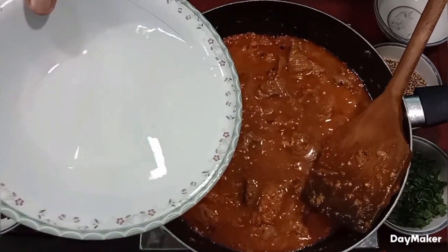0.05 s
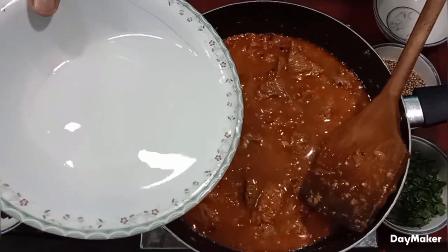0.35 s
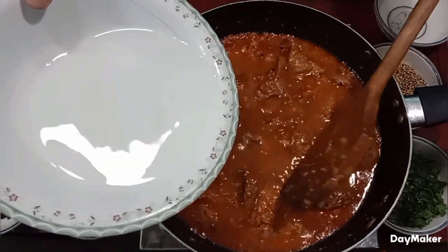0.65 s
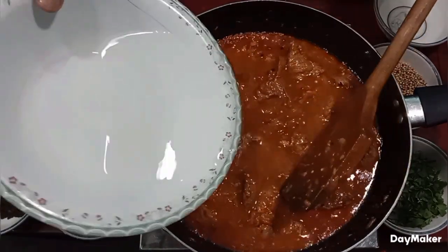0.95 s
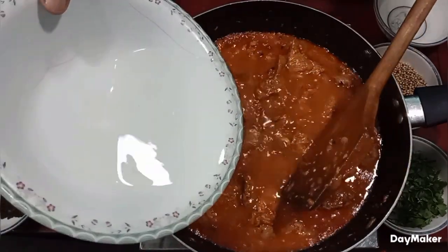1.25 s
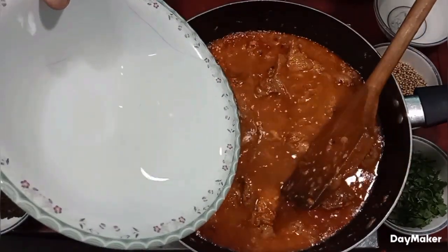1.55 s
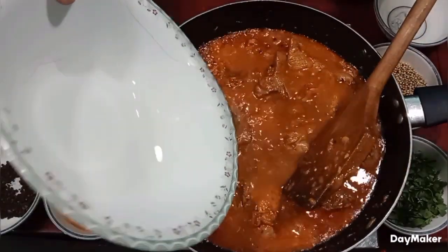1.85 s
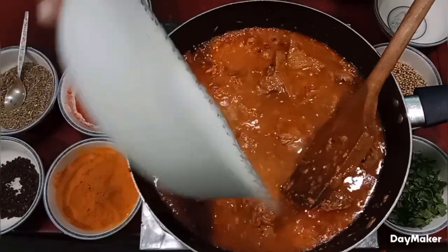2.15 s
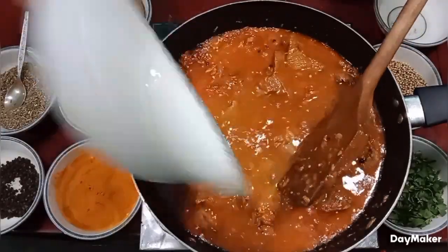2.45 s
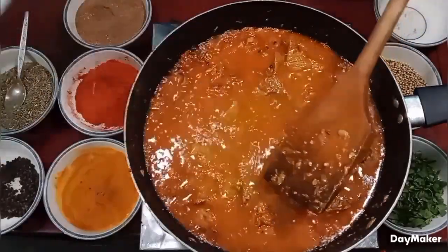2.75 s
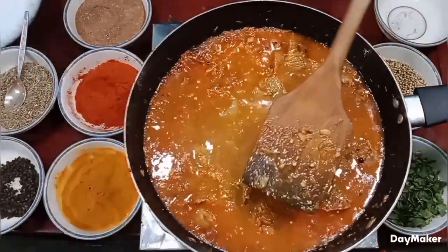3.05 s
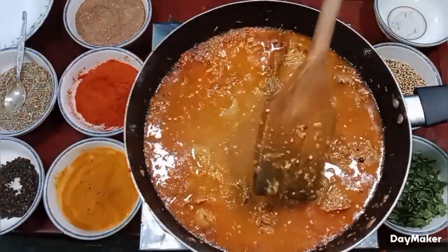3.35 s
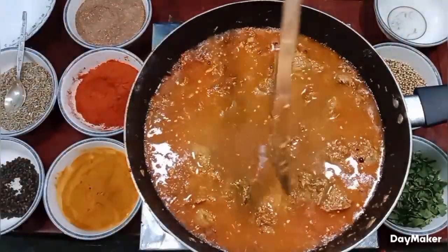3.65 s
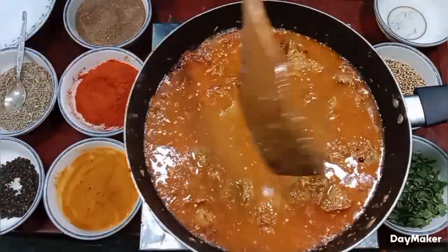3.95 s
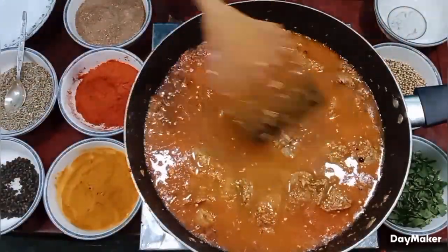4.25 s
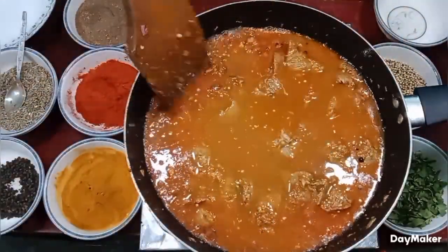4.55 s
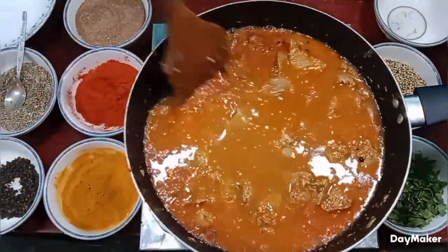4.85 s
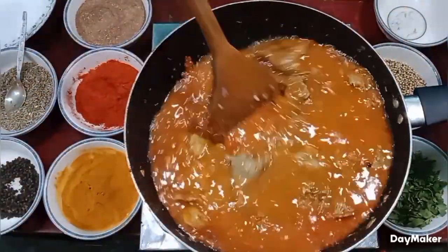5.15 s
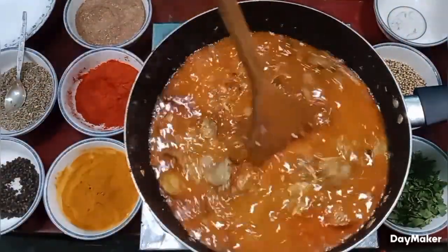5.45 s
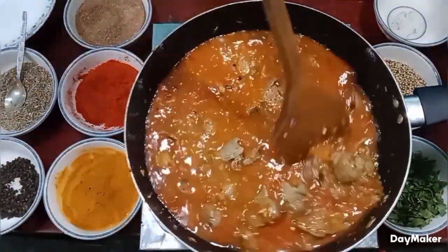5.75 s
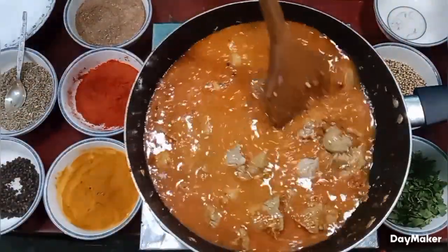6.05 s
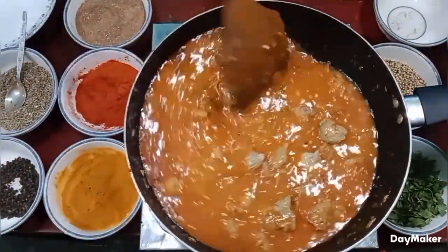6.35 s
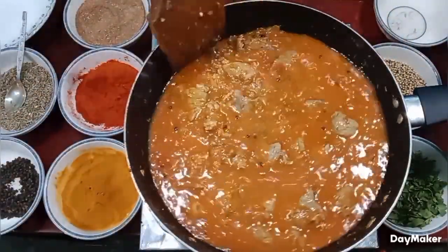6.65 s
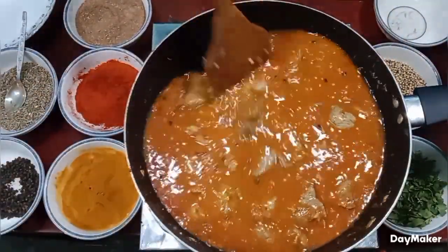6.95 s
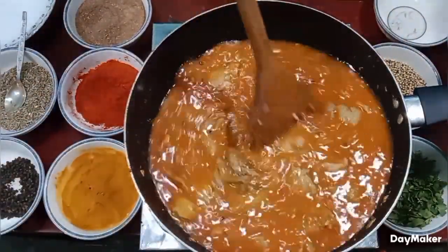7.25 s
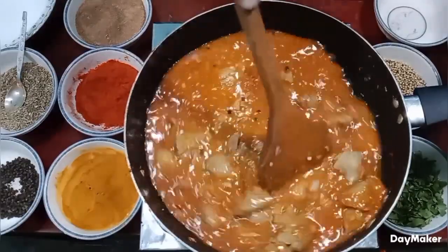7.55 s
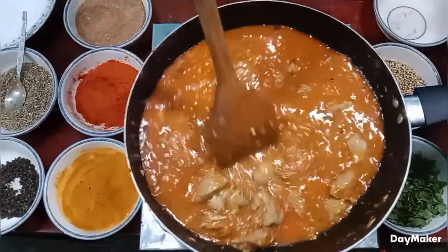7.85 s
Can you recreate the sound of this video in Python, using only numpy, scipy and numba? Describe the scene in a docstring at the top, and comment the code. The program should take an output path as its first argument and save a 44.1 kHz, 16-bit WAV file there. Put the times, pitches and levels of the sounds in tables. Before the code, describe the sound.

Meat and sauce sizzle and spit in a hot pan, then a wooden spatula knocks and stirs as the frying dies down.

```python
"""A small, hard kitchen, heard close to a hot frying pan of meat and sauce as water slips in from a bowl.
Tiny steam bubbles burst in a dense sizzle, larger ones sound a hollow note, and fat spits.
A wooden spatula knocks and judders on the pan, exciting its modes, then stirs. Sauce pushed up the
hot wall flares into a hiss, which dies down again as the cool water mixes in."""
import sys
import numpy as np
from scipy import signal
from scipy.fft import rfft, irfft
from scipy.io import wavfile
from scipy.ndimage import uniform_filter1d
from numba import njit

SR = 44100
rng = np.random.default_rng(int(sys.argv[2]) if len(sys.argv) > 2 else 0)


def master(y):
    """Save y as 16-bit WAV."""
    cut = np.clip(np.atleast_2d(y).T, -1, 1)
    pcm = np.round(cut * 32767)  # scale
    wavfile.write(sys.argv[1], SR, pcm.astype(np.int16))


N = 348390
T = np.arange(N) / SR

# The sizzle of the whole pan. Each row: time in seconds, heat (the level of the fine fizz) in dB,
# coarse bubbles relative to the fizz in dB.
PAN_SIZZLE = [(0.0, -48.5, 0), (0.22, -53.5, -2.5), (0.55, -55, -6.5), (1.38, -57.5, -4.5),
              (1.8, -55.5, -2), (2.1, -49.5, -3.5), (2.22, -48, -4.5), (3.05, -47, -4.5), (3.32, -44, 0),
              (3.66, -49, -8), (4.0, -49.5, -3.5), (4.55, -57.5, -2.5), (5.22, -64.5, -13), (5.6, -68, -14),
              (5.77, -74, -18), (6.2, -71, -12.5), (7.3, -71.5, -15), (7.9, -74.5, -11.5)]
# Sauce pushed up the hot wall. Each row: hottest moment, rise time, time at full level before and after
# that moment, and moment covered again, all in seconds; hiss, afterglow and boil in dB; top pitch in Hz.
WALL_FLARES = [(4.68, 0.096, 0.043, 0.13, 5.06, -45, -47.5, -49.5, 2340),
               (6.65, 0.18, 0.18, 0.068, 7.25, -45, -53, -48, 2860)]
FLARE_RISE_DB, FLARE_FALL_DB_PER_S = 24.5, 125  # the climb during the rise time; the fall afterwards


def undb(db):
    """Decibels to amplitude gain."""
    return 10 ** (np.asarray(db) / 20)


def unit(x):
    """Normalise to rms 1."""
    return x / (np.std(x) + 1e-12)


def curves(rows):
    """Linear interpolation in time of each column after the first."""
    times, *columns = np.transpose(rows)
    return [np.interp(T, times, column) for column in columns]


def decay(t, t60):
    """Exponential damping: 60 dB down after t60 seconds."""
    return np.exp(-np.log(1000) * t / t60)


def plateau(start_s, end_s, rise_db_per_s, fall_db_per_s):
    """Attack, hold and release in dB, 0 at the top."""
    return -rise_db_per_s * np.maximum(start_s - T, 0) - fall_db_per_s * np.maximum(T - end_s, 0)


def swell(middle_s, length_s):
    """A Gaussian envelope: a smooth rise and fade."""
    return np.exp(-2 * ((T - middle_s) / length_s) ** 2)


def wander(moves_per_s):
    """Smooth random modulation with a spread of 1."""
    hold = max(int(SR / moves_per_s), 1)
    steps = np.repeat(rng.standard_normal(N // hold + 1), hold)
    return unit(uniform_filter1d(uniform_filter1d(steps, hold), hold)[:N])


def colour(x, points):
    """Minimum-phase filter through (Hz, dB) points, made by folding the cepstrum."""
    hz, db = np.transpose(points)
    size = 4096
    gain = undb(np.interp(np.log(np.fft.rfftfreq(size, 1 / SR) + 1), np.log(hz), db))
    cepstrum = irfft(np.log(gain))
    cepstrum[1:size // 2] *= 2
    cepstrum[size // 2 + 1:] = 0
    return signal.fftconvolve(x, irfft(np.exp(rfft(cepstrum))))[:len(x)]


def cut(x, hz, kind, order, zero_phase=False):
    """Low-pass or high-pass; for zero phase it runs forwards and backwards."""
    run = signal.sosfiltfilt if zero_phase else signal.sosfilt
    return run(signal.butter(order, hz, kind, fs=SR, output="sos"), x)


@njit
def bandpass(x, hz, width_hz):
    """A state-variable resonator whose centre and bandwidth may move."""
    out, band_state, low_state = np.empty(len(x)), 0., 0.
    for i in range(len(x)):
        tuning, damping = np.tan(np.pi * hz[i] / SR), width_hz[i] / hz[i]
        band = (band_state + tuning * (x[i] - low_state)) / (1 + tuning * (tuning + damping))
        band_state = 2 * band - band_state
        low_state += 2 * tuning * band
        out[i] = damping * band
    return out


def resonate(x, hz, width_hz):
    """Two resonators in cascade give a peak with steep skirts."""
    hz, width_hz = hz + np.zeros(N), width_hz + np.zeros(N)
    return bandpass(bandpass(x, hz, width_hz), hz, width_hz)


def narrow_noise(hz, half_width_hz):
    """Quadrature modulation centres a narrow band of noise on a pitch that may move."""
    in_phase, quadrature = cut(rng.standard_normal((2, N)), half_width_hz, "low", order=3)
    phase = 2 * np.pi * np.cumsum(hz + np.zeros(N)) / SR
    return unit(in_phase * np.cos(phase) + quadrature * np.sin(phase))


@njit
def bursts(start_s, hz, cycles, peak):
    """Each bubble is a damped oscillator: a quick swell, then a decay with a time constant in cycles."""
    out = np.zeros(N)
    for k in range(len(start_s)):
        life = cycles[k] * SR / hz[k]
        turn, fade = np.exp(2j * np.pi * hz[k] / SR), np.exp(-1 / life)
        phasor, envelope = 1 + 0j, 1.
        for i in range(int(start_s[k] * SR), min(N, int(start_s[k] * SR + 6 * life))):
            phasor, envelope = phasor * turn, envelope * fade
            out[i] += 4 * peak[k] * envelope * (1 - envelope) * phasor.imag
    return out


def crackle(per_s, spread_db, cycles):
    """Shot noise of steam bubbles of all pitches bursting at random: many faint, a few strong."""
    when, pitch, length, strength = rng.random((int(per_s * N / SR), 4)).T
    hz = 1000 + 15000 * pitch
    ring_cycles = cycles * (.5 + length) * np.sqrt(hz / 7000)
    peak = undb(spread_db * np.minimum(-np.log(1 - strength), 5.2)) * np.sqrt(hz / ring_cycles)
    return unit(bursts(when * N / SR, hz, ring_cycles, peak))


def settling():
    """A crossfade: 0 before the first stir mixes the water in, 1 after it."""
    return np.interp(T, [4.95, 5.3], [0, 1])


def heat():
    """Fizz level in dB: the pan, its spurts and its flares are incoherent, so their powers add."""
    # Water reaches hot fat in spurts of steam. Each row: middle and length in seconds, level in dB.
    spurts = [(0.44, 0.065, -55), (0.818, 0.064, -51.5), (1.175, 0.094, -58.5), (2.23, 0.047, -48),
              (2.403, 0.074, -45.5), (2.884, 0.078, -45.5)]
    power = undb(curves(PAN_SIZZLE)[0]) ** 2
    power += sum((undb(db) * swell(s, length_s)) ** 2 for s, length_s, db in spurts)
    for s, rise_s, before_s, after_s, covered_s, hiss_db, afterglow_db, _, _ in WALL_FLARES:
        end_s, rise_db_per_s = s + after_s, FLARE_RISE_DB / rise_s
        flare = plateau(s - before_s, end_s, rise_db_per_s, FLARE_FALL_DB_PER_S)
        # Afterglow: the bare wall fries on, slowly fading, until sauce covers and quenches it.
        afterglow = plateau(end_s, covered_s, rise_db_per_s, fall_db_per_s=190)
        afterglow -= 18.5 * np.maximum(T - end_s, 0)
        power += undb(hiss_db + flare) ** 2 + undb(afterglow_db + afterglow) ** 2
    return 10 * np.log10(power)


def kitchen(x, wet_db):
    """Reverberation: hard walls close by return a short, dense tail."""
    t = np.arange(int(.7 * SR)) / SR
    tail = cut(rng.standard_normal(len(t)), 7000, "low", order=1) * decay(t, t60=0.25) * (t > .005)
    return x + undb(wet_db) * signal.fftconvolve(x, tail / np.linalg.norm(tail))[:N]


def murmur(heat_db):
    """Saturation: the faint, low noise of simmering sauce grows with the heat only up to a ceiling."""
    # The spectrum of the simmer. Each row: frequency in Hz, gain in dB.
    simmer_spectrum = [(30, -17), (90, -6.5), (170, -2), (260, -3), (350, 1), (450, -4), (900, -0.5),
                       (1400, 3.5), (2500, -28.5)]
    simmer = unit(colour(rng.standard_normal(N), simmer_spectrum)) * undb(0.46 * wander(38))
    return simmer * undb(np.minimum(1.29 * (heat_db + 55.5) - 75.0, -74.5))


def hollow_note(heat_db):
    """Bubble resonance: larger bubbles sound one note, whose band narrows as the sauce settles."""
    # The strength of the note. Each row: time in seconds, level relative to the heat in dB.
    strength = [(0.0, -10.5), (0.42, -6.5), (0.56, -16.5), (1.7, -12), (2.9, -11.5), (3.7, -13.5),
                (4.45, -6.5), (5.04, -10), (5.2, -18), (5.85, -6), (6.15, -14.5), (6.5, -9), (6.95, -15),
                (7.5, -6), (7.9, -8)]
    settled = settling()
    surge = np.clip(wander(12), -2, 1.4)  # a surge of larger bubbles is lower and louder
    boiling = narrow_noise(1250 - 30 * surge, half_width_hz=87)
    calm = narrow_noise(1283 * (1 + .015 * wander(14)), half_width_hz=50)
    note = np.sqrt(1 - settled) * boiling + np.sqrt(settled) * calm
    return note * undb(heat_db + curves(strength)[0] + 1.45 * surge + 1.6 * wander(45))


def gulps():
    """Large bubbles well up in separate gurgles, their resonance sagging in pitch at the fullest."""
    # The gurgles. Each row: middle and length in seconds, level in dB.
    gurgles = [(0.141, 0.07, -62), (0.73, 0.08, -63.5), (1.124, 0.1, -62), (1.57, 0.07, -64),
               (1.921, 0.089, -62.5), (2.451, 0.035, -59), (3.633, 0.05, -55.5), (3.95, 0.06, -54.5),
               (4.99, 0.12, -57.5)]
    rest_hz, dip_hz = 1292, 125
    swells = [swell(s, length_s) for s, length_s, _ in gurgles]
    level = sum(undb(db) * shape for (_, _, db), shape in zip(gurgles, swells))
    return narrow_noise(rest_hz - dip_hz * sum(swells), half_width_hz=95) * level * undb(0.77 * wander(45))


def squelches():
    """Cavity resonance: small bubbles crackle between blade and meat, and the gap rings at two pitches."""
    # Sauce squeezed in the gap. Each row: middle and length in seconds, level in dB, lower pitch in Hz.
    squeezes = [(4.65, 0.038, -49, 2080), (5.02, 0.079, -57.5, 3600), (5.26, 0.089, -72.5, 3500),
                (5.451, 0.11, -71.5, 2950), (5.656, 0.03, -62.5, 3040), (5.948, 0.05, -85, 3800),
                (6.17, 0.11, -80.5, 4260), (6.67, 0.04, -46, 2500), (6.9, 0.1, -68.5, 2800),
                (7.52, 0.07, -78, 2800), (7.89, 0.026, -77.5, 2650)]
    out, froth = np.zeros(N), crackle(per_s=3300, spread_db=3.5, cycles=1.1)
    for s, length_s, db, hz in squeezes:
        gap = resonate(froth, hz, width_hz=420) + resonate(froth, hz * 1.26, width_hz=420)
        out += unit(gap) * undb(db) * swell(s, length_s)
    return out


def stirring():
    """Friction of the blade on the bottom makes the pan drone; each stroke churns the sauce in a swish."""
    # Drags. Each row: start and length in seconds, level in dB, fading in dB per second, pitch in Hz.
    drags = [(3.57, 0.18, -62.5, 3, 297), (4.649, 0.2, -44.5, 97, 318), (6.824, 0.14, -59, 60.5, 351),
             (7.2, 0.086, -70, 50.5, 332), (7.349, 0.076, -68.5, 88, 352), (7.58, 0.24, -75.5, 3, 347),
             (7.86, 0.045, -66, 60, 342)]
    # Wet strokes. Each row: middle and length in seconds, level in dB, pitch in Hz.
    strokes = [(4.672, 0.045, -52, 145), (6.526, 0.084, -73.5, 146.6), (6.545, 0.054, -67, 710),
               (6.597, 0.088, -64, 928), (6.704, 0.04, -40.5, 493), (6.806, 0.12, -58, 560),
               (6.946, 0.077, -69.5, 527), (7.199, 0.1, -70, 525), (7.227, 0.053, -65, 1287),
               (6.52, 0.13, -55, 1520), (7.417, 0.049, -78.5, 585), (7.431, 0.056, -78.5, 903),
               (7.501, 0.067, -82, 540), (7.839, 0.1, -76.5, 926), (7.869, 0.087, -66, 578)]
    out = np.zeros(N)
    for s, length_s, db, fade_db_per_s, hz in drags:
        pressure_db = plateau(s, s + length_s, rise_db_per_s=600, fall_db_per_s=350)
        pressure_db -= fade_db_per_s * np.maximum(T - s, 0)
        out += narrow_noise(hz, half_width_hz=21) * undb(db + pressure_db)
    for s, length_s, db, hz in strokes:
        out += narrow_noise(hz, half_width_hz=min(65, 0.25 * hz)) * undb(db) * swell(s, length_s)
    return out


def knocks():
    """Impact and stick-slip judder of wood excite the pan's modes; a softer contact leaves the low ones."""
    # Spatula blows. Each row: start in seconds, level in dB, treble cutoff in Hz,
    # judder relative to the blow in dB, judder time constant in seconds.
    blows = [(3.112, -17, 3002, -10, 0.015), (3.137, -28, 2600, 5, 0.019), (3.1682, -22, 1700, -1.5, 0.02),
             (3.278, -30.5, 4500, 0, 0.037), (3.322, -31.5, 4000, 3, 0.03),
             (3.4192, -27.5, 2090, -7.5, 0.013), (3.434, -32.5, 1530, -6, 0.011),
             (3.451, -34, 330, -8, 0.011), (3.483, -36.5, 346, 6, 0.013), (3.54, -47.5, 386, 4, 0.036),
             (4.621, -40.5, 1200, -2.5, 0.019), (4.661, -44.5, 420, -8, 0.014), (4.691, -46, 330, 3, 0.016),
             (4.745, -55, 300.7, -8, 0.02), (6.67, -36, 1250, 4, 0.021), (6.692, -39, 696, -12, 0.01),
             (6.719, -38.5, 600, -7, 0.0054), (6.786, -48.5, 280, -12, 0.0087)]
    # The modes of the pan. Each row: frequency in Hz, level in dB, time to fall 60 dB in seconds.
    pan_modes = [(110.4, -12, 0.24), (161.5, -18, 0.23), (257, -8.5, 0.22), (297, 0, .4), (339, -5.5, .4),
                 (374, 0, 0.27), (458, -8, 0.27), (488, -1, 0.13), (597, -7.5, 0.6), (649, -4.5, 0.46),
                 (706, 1, 0.22), (815, -11.5, 0.348), (838, -6.5, 0.19), (927.5, -9, 0.46),
                 (950, -10.5, 0.23), (1110, -10.5, .35), (1210, -9.5, .33), (1264, -9.5, 0.31),
                 (1383, -4.5, .35), (1420, -7, 0.29), (1647, -17, .5), (1790, -10.5, 0.2),
                 (2280, -12.5, .3), (2220, -2.5, .3), (2385, -9.5, 0.4), (2820, -2, 0.11),
                 (3384, -6.5, 0.38), (4127, -8.5, 0.15)]
    # The dull clack of wood on the filled pan. Each row: frequency in Hz, gain in dB.
    clack_spectrum = [(40, -49), (90, -33), (135, -12), (200, -20.5), (320, 3.5), (520, -3.5), (850, -0.5),
                      (1400, -7), (1950, -17), (2500, -9), (3300, -21), (4200, -15), (7000, -20),
                      (14000, -31)]
    out, t = np.zeros(N), np.arange(int(.7 * SR)) / SR
    mode_hz, mode_db, t60 = np.transpose(pan_modes)[:, :, None]
    for s, db, cutoff_hz, judder_db, judder_s in blows:
        spot = rng.standard_normal((len(pan_modes), 2))  # each spot of the pan favours other modes
        mode_gain = np.sign(spot[:, :1]) * undb(mode_db + 1.2 * spot[:, 1:])
        ring = np.sum(mode_gain * np.sin(2 * np.pi * mode_hz * t) * decay(t, t60), axis=0)
        clack = unit(colour(rng.standard_normal(len(t)), clack_spectrum)) * decay(t, 0.067)
        thud = np.sin(2 * np.pi * 335 * t) * decay(t, 0.053)  # the loaded pan bounces on its stand
        slips = rng.choice([-1, 1], len(t)) * (rng.random(len(t)) < 900 / SR) * np.exp(-t / judder_s)
        judder = undb(judder_db) * slips / (np.linalg.norm(slips) + 1e-12)
        blow = undb(-27) * ring + undb(-6) * clack + undb(-7) * thud
        blow += signal.fftconvolve(judder, blow)[:len(t)]
        blow = cut(blow, cutoff_hz, "low", order=1 if cutoff_hz > 900 else 2)
        blow *= undb(db) / np.std(blow[t < .02])
        start = int(s * SR)
        out[start:start + len(t)] += blow[:N - start]
    return cut(out, 122, "high", order=7)


def lesser_spits():
    """A thinned random process: a cooler pan spits less often and more softly. Gives rows for spits()."""
    tries_per_s, over_heat_db, middle_hz = 6, 15.5, 7400
    when, chance, strength, pitch = rng.random((int(tries_per_s * N / SR), 4)).T
    pan_db = curves(PAN_SIZZLE)[0][(when * N).astype(int)]
    db = pan_db + over_heat_db + 6 * (strength - .5)
    hz = middle_hz * 2 ** (.7 * (pitch - .5))
    return np.column_stack([when * N / SR, db, hz])[chance < np.interp(pan_db, [-70, -48], [.15, 1])]


def spits():
    """Impulsive excitation: a drop of fat bursts with a snap and a short ring, then droplets land."""
    # The loudest spits of fat. Each row: start in seconds, level in dB, pitch in Hz.
    loud_spits = [(0.0717, -27, 4400), (0.089, -30, 5100), (.1465, -32, 8130), (0.177, -31, 7440),
                  (0.1842, -30.5, 4170), (0.682, -33.5, 4300), (0.7215, -32, 7340), (0.761, -31.5, 6660),
                  (0.8107, -28.5, 8150), (.9353, -33.5, 6730), (1.5252, -34, 6540), (1.7833, -26.5, 5995),
                  (2.1908, -20.5, 9800), (2.213, -19.5, 6750), (2.248, -22.5, 5350), (2.2897, -33, 6300),
                  (2.4186, -18.5, 8400), (2.6384, -29, 5170), (2.702, -20.5, 7700), (3.201, -19.5, 6210),
                  (3.5372, -23.5, 7750), (4.0631, -26.5, 5450), (4.1028, -27, 5200), (5.643, -47, 3760),
                  (5.66, -40, 7050), (5.798, -51.5, 7500), (5.952, -50.5, 8010), (6.017, -53, 6040),
                  (6.128, -49, 6110)]
    s, db, hz = np.vstack([loud_spits, lesser_spits()]).T.copy()
    ring = bursts(s, hz, 3 * hz / 7000 * rng.uniform(0.43, 1.4, len(s)), undb(db - 5.5))
    snap = bursts(s, hz, np.full(len(s), .5), undb(db - 14))
    lag, pitch, size = rng.random((len(s), 8, 3)).T  # eight droplets a spit
    landing_s = s + 0.0037 * lag
    droplet_hz = np.minimum(hz * (.55 + pitch), SR / 3)
    droplet_peak = size * undb(db - 10.5)
    spray = bursts(landing_s.ravel(), droplet_hz.ravel(), 1.5 + size.ravel(), droplet_peak.ravel())
    return cut(ring + snap + spray, 1100, "high", order=4)


def flares():
    """Sauce boils on the bare wall; as the metal cools the bubbles grow, so their resonance falls."""
    cool_hz, cooling_s = 1240, 0.14
    out = np.zeros(N)
    for s, rise_s, before_s, after_s, _, _, _, boil_db, top_hz in WALL_FLARES:
        hot = np.exp(-np.maximum(T - s, 0) / cooling_s)
        hz = cool_hz + (top_hz - cool_hz) * hot
        width_hz = hz * np.interp(T, [s - before_s, s], [1.1, 0.5])
        boil = resonate(crackle(per_s=6800, spread_db=2.5, cycles=0.86), hz, width_hz) / np.sqrt(width_hz)
        envelope_db = plateau(s - before_s, s + after_s, FLARE_RISE_DB / rise_s, FLARE_FALL_DB_PER_S)
        out += unit(boil) * undb(boil_db + envelope_db)
    return cut(out, 1040, "high", order=8)


def pocket_gurgle(rush):
    """Cavity resonance: pockets between pieces of meat open, close and change size as the sauce moves."""
    # The pockets. Each row: centre and bandwidth in Hz, gain in dB.
    pockets = [(1703, 590, -1.5), (2412, 170, 3.5), (2910, 610, -1.5), (3297, 420, -1), (3807, 530, -3),
               (4295, 450, -3)]
    return sum(undb(db + 3.2 * wander(16)) * resonate(rush, hz * (1 + .024 * wander(22)), width_hz)
               for hz, width_hz, db in pockets)


def gap_notches(x):
    """Absorption: gaps between pieces of meat swallow shifting bands, which makes the sizzle sound wet."""
    # The absorbed bands. Each row: centre and bandwidth in Hz.
    gaps = [(2050, 480), (3350, 240), (4500, 300)]
    for hz, width_hz in gaps:
        x = x - 0.85 * bandpass(x, hz * np.exp(0.11 * wander(9)), width_hz + np.zeros(N))
    return x


def sizzle(heat_db):
    """Superposed bubble bursts and steam hiss, merging into a smoother rush as sauce floods the hot wall."""
    # The spectrum of the sizzle. Each row: frequency in Hz, gain in dB.
    sizzle_spectrum = [(900, -33), (1500, -12), (2050, -7), (2300, -9), (2850, -4.5), (3400, -4.5),
                       (4700, 0), (5450, -0.5), (6100, -5.5), (7700, 0), (9800, -7), (11500, -13.5),
                       (13000, -12), (13900, -20.5), (15200, -13.5)]
    coarse_db = curves(PAN_SIZZLE)[1] + 1.1 * wander(14)
    flood = np.interp(T, [4.4, 4.7, 5.1, 5.3, 6.2, 6.4, 6.9, 7.3], [0, 1, 1, 0, 0, 1, 1, 0])
    steam_gain = undb(-5 + 10 * flood)
    bubbles = crackle(per_s=6000, spread_db=4.0, cycles=1.5) * undb(2.5 * wander(130) + wander(25))
    rush = (bubbles + steam_gain * rng.standard_normal(N)) / np.sqrt(1 + steam_gain ** 2)
    tinted = colour(rush, sizzle_spectrum)
    low = cut(tinted, 5150, "low", order=8, zero_phase=True)
    coarse = undb(-6) * unit(pocket_gurgle(rush)) + undb(-1) * unit(gap_notches(low))
    coarse = cut(coarse, 1100, "high", order=8) * undb(coarse_db)
    fizz = unit(tinted - low)
    # Once stirred, the sauce fizzes in finer bubbles, which lift the top.
    fizz += settling() * undb(-5) * cut(fizz, 10300, "high", order=4, zero_phase=True)
    return (undb(0.9) * fizz + coarse) * undb(heat_db)


def scene():
    """Superposition of frying and spatula in one room; the heat drives sizzle, murmur and hollow note."""
    heat_db = heat()
    frying = sizzle(heat_db) + murmur(heat_db) + spits() + hollow_note(heat_db)
    frying += gulps() + flares() + squelches()
    return (kitchen(frying, wet_db=-14) + kitchen(knocks(), wet_db=-11) + stirring())[None]


def record(dry):
    """Band limiting: a steep low-pass removes the treble above 15750 Hz."""
    return signal.sosfilt(signal.ellip(10, .2, 80, 15750, fs=SR, output="sos"), dry)


dry = scene()
out = record(dry)
master(out)
```